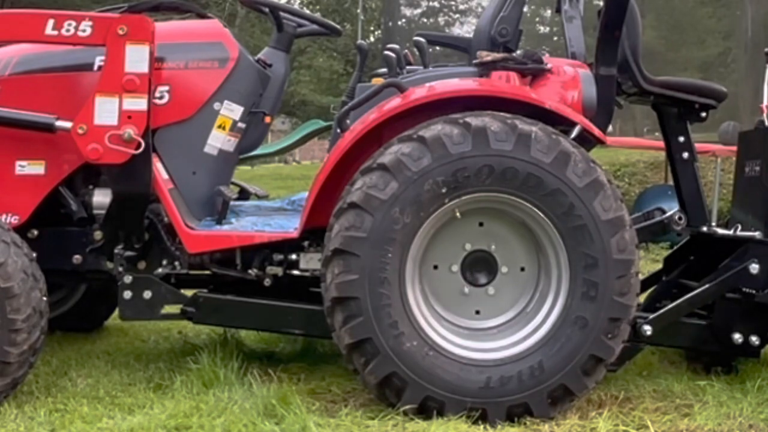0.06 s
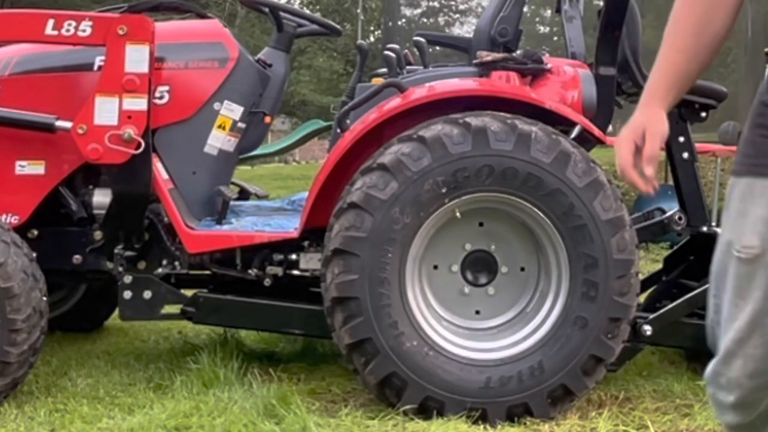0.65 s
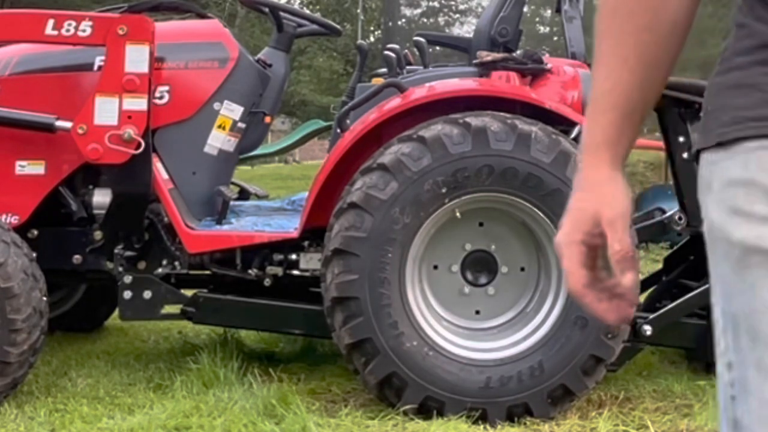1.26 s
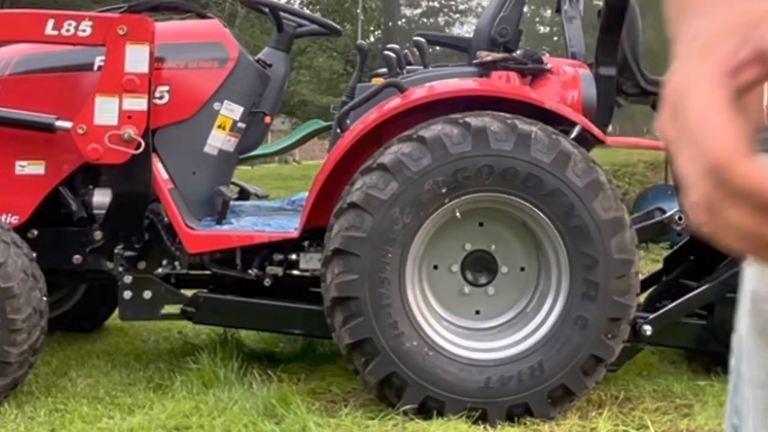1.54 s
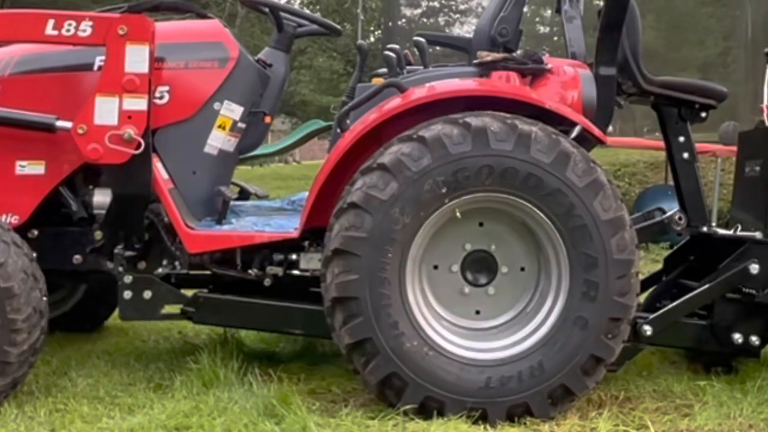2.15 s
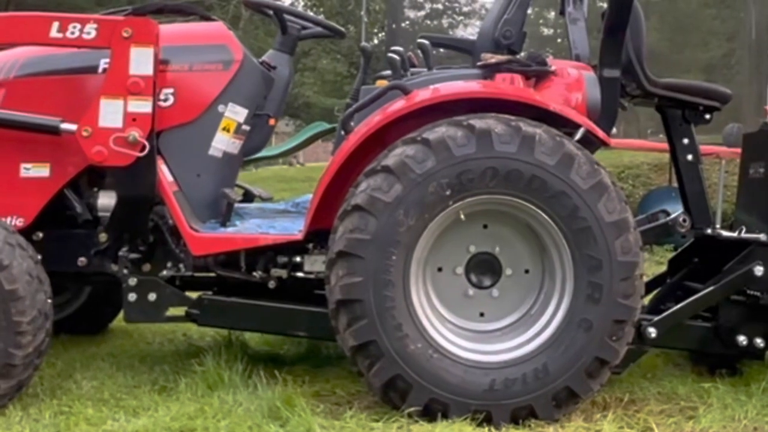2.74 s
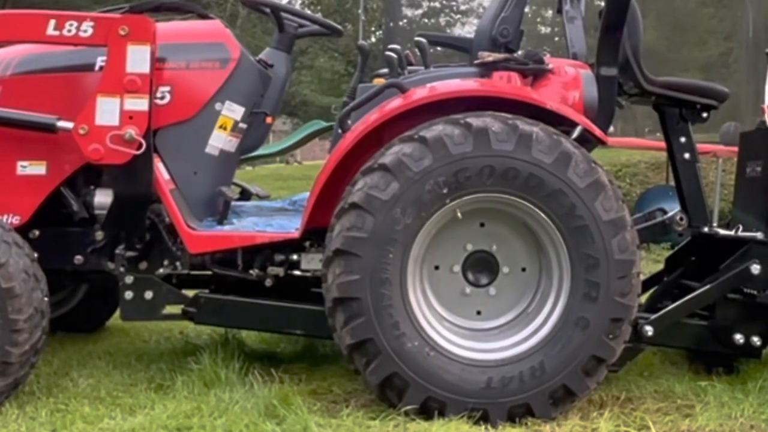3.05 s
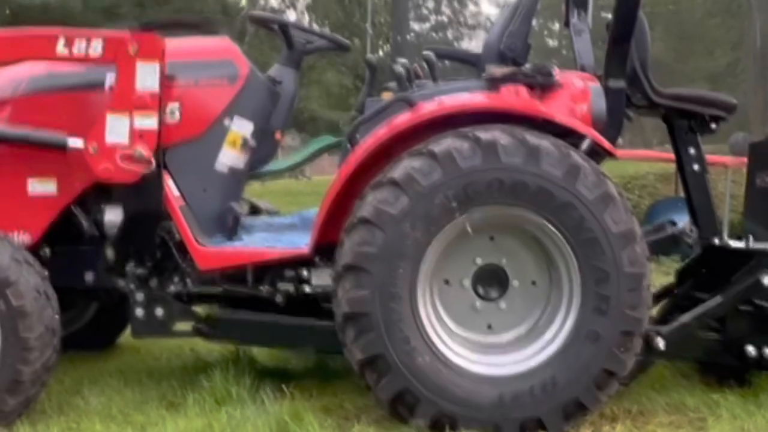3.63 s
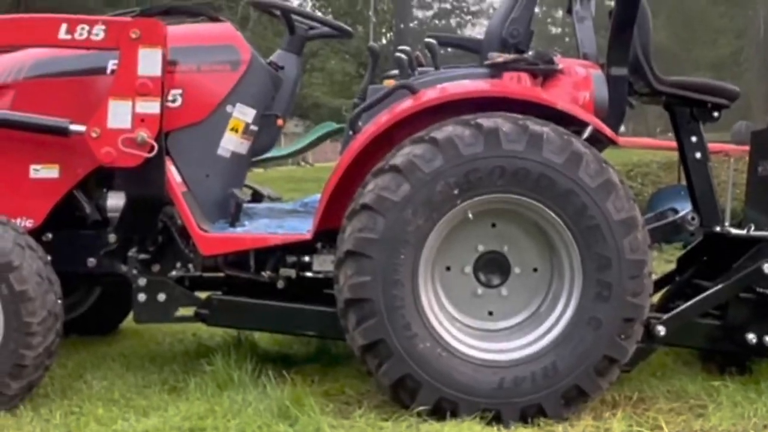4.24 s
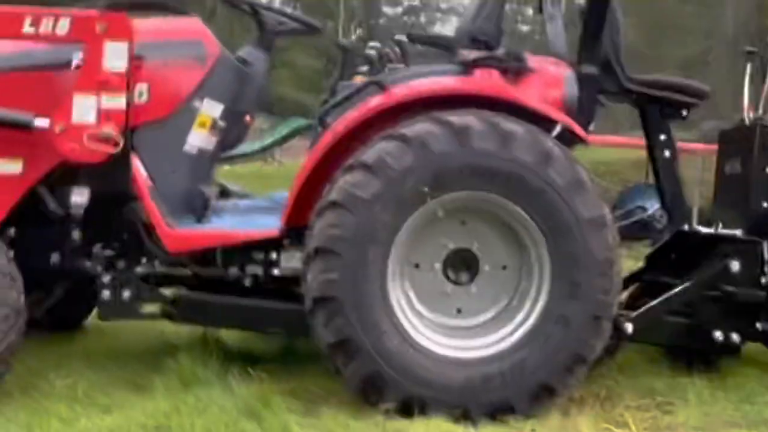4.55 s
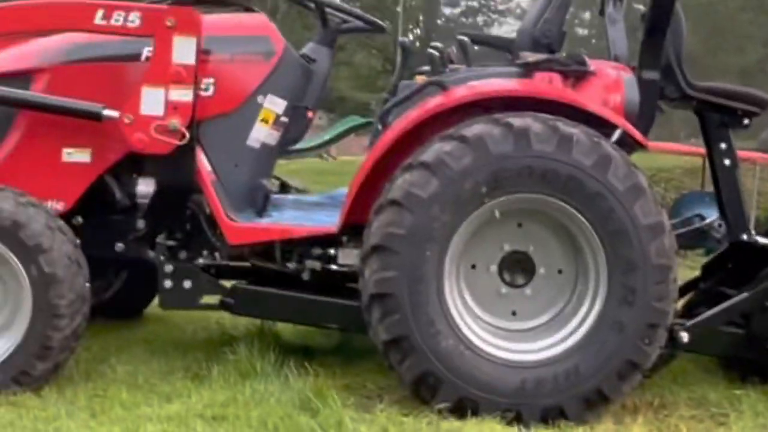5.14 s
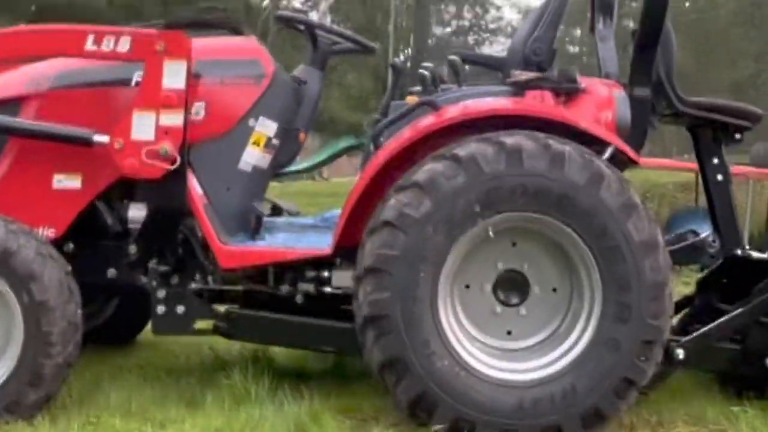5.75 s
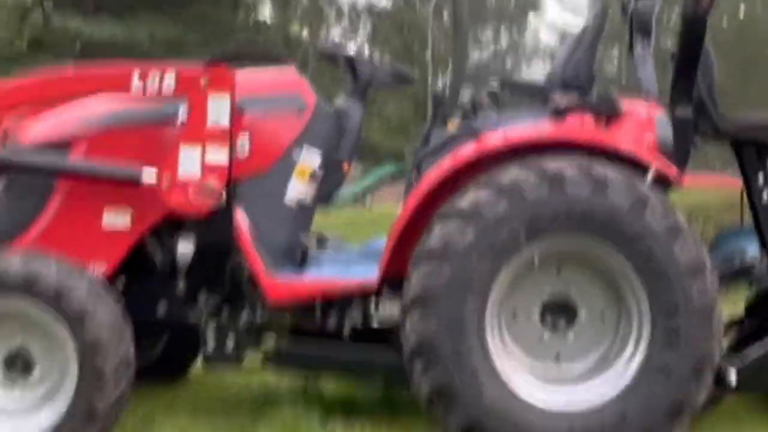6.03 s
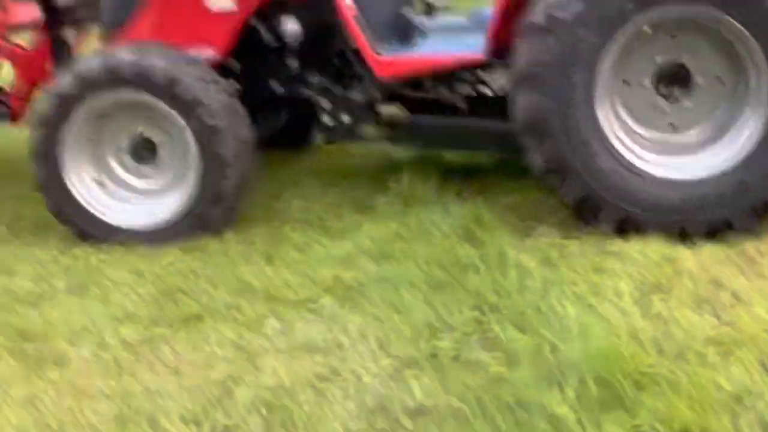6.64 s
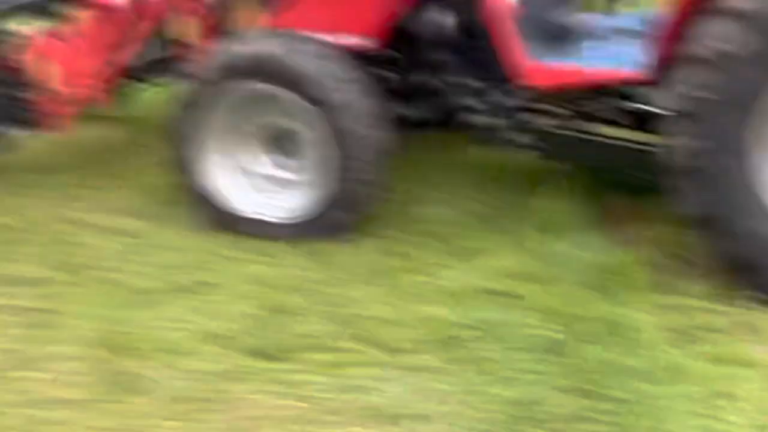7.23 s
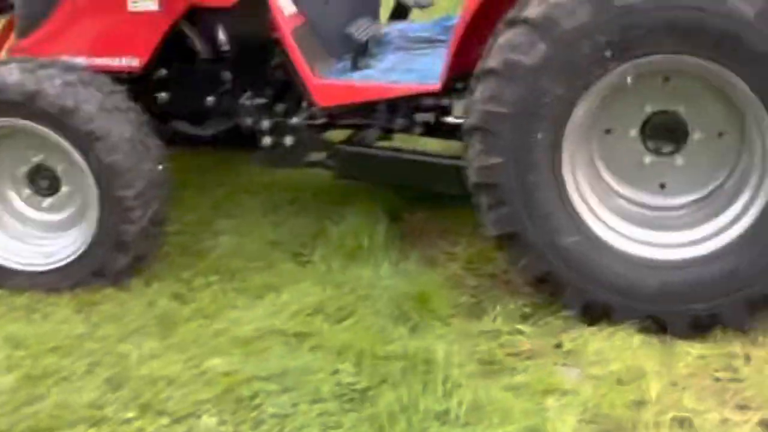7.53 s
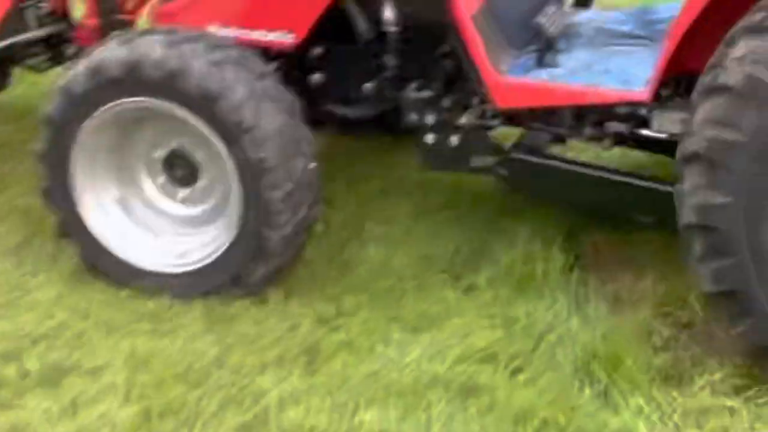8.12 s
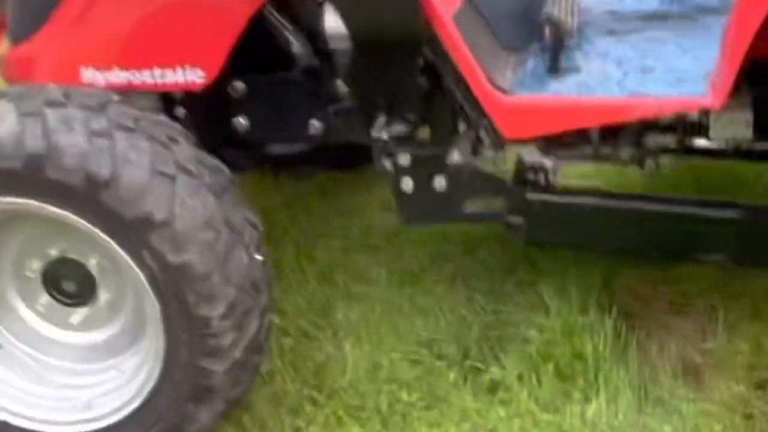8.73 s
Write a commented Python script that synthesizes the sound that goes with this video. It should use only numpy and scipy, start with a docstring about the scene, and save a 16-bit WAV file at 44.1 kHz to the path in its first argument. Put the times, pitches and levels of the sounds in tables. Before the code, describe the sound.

Outdoors, the steady throb and ticking clatter of an idling diesel tractor run throughout. Very close hollow knocks, soft thumps and plastic clicks break in as the camera is worked out of a spring clamp, peaking in one loud, rattling cluster. More light taps and rubs follow. Then the microphone is carried through rustling grass toward the engine, which becomes louder and more clattery.

```python
"""A three-cylinder compact tractor idles on a lawn: exhaust throb, and block clatter at every firing.
Someone takes hold of the camera and works it out of a sprung clamp: fingers knock, the stand thumps,
the jaw clicks and the spring rings, right at the microphones. The hardest hits push a limiter down.
Then they carry it through swishing grass towards the engine, which grows louder."""
import sys
import numpy as np
from scipy import signal
from scipy.fft import rfft, irfft, next_fast_len
from scipy.io import wavfile
from scipy.ndimage import uniform_filter1d, minimum_filter1d

SR = 44100
rng = np.random.default_rng(int(sys.argv[2]) if len(sys.argv) > 2 else 0)


def int16_out(signal):
    """Quantize to a 16-bit WAV file."""
    q = np.round(np.clip(np.atleast_2d(signal).T, -1, 1) * 32767)
    wavfile.write(sys.argv[1], SR, q.astype(np.int16))


N = 396018
TIME = np.arange(N) / SR
CRANK_HZ, CYLINDER_COUNT = 20.8, 3
FIRING_HZ = CRANK_HZ * CYLINDER_COUNT / 2   # one cycle = two crank turns


def from_db(db):
    return 10 ** (np.asarray(db) / 20)


def unit_rms(x):
    return x / np.sqrt(np.mean(x ** 2) + 1e-20)


def unit_hit(sound):
    """Scale a stereo hit to the energy of 20 ms at rms 1."""
    return sound / np.sqrt(np.sum(sound ** 2) / 2 / (SR / 50) + 1e-20)


def at_hz(points, hz):
    """Read a table on a log-frequency axis."""
    point_hz, value = np.transpose(points)
    return np.interp(np.log(hz + 1), np.log(point_hz), value)


def drift(rate_hz):
    """Random wander, rms 1."""
    knots = rng.standard_normal(int(rate_hz * N / SR) + 2)
    return unit_rms(np.interp(TIME * rate_hz, np.arange(len(knots)), knots))


def band(x, low_hz, high_hz):
    return signal.sosfilt(signal.butter(2, [low_hz, high_hz], "band", fs=SR, output="sos"), x)


def pan(left_db):
    """Constant-power stereo gains; left_db is left minus right."""
    return unit_rms(from_db([[left_db / 2], [-left_db / 2]]))


def add(out, start_s, sound):
    at = round(start_s * SR)
    out[:, at:at + sound.shape[1]] += sound[:, :N - at]


def noise(spectrum, resonances=(), white=None):
    """Shaped stereo noise, rms 1; microphone likeness and balance vary with frequency."""
    # Likeness of the two microphones: freq_hz, correlation (clipped below)
    likeness = [(60, 1), (130, 0.3), (270, 1.16), (580, -0.67), (1230, 1), (2620, -0.24), (5570, 0),
                (11800, 0)]
    # Their balance: freq_hz, left_db
    left_bias = [(60, -5), (110, 1.5), (190, 1), (350, 1.5), (630, 6.5), (1130, 8.5), (2030, 1), (3660, 1),
                 (6590, 5.5), (11800, -8.5)]
    size = next_fast_len(N)
    hz = np.arange(size // 2 + 1) * SR / size
    peaks_db = sum(lift / (1 + (2 * (hz - centre) / width) ** 2) for centre, width, lift in resonances)
    alike, sign = np.clip(at_hz(likeness, hz), -.98, .98), np.array([[1], [-1]])
    level_db = at_hz(spectrum, hz) + peaks_db + sign * at_hz(left_bias, hz) / 2
    mid, side = rfft(rng.standard_normal((2, size)) if white is None else white, size)
    pair = np.sqrt(1 + alike) * mid + sign * np.sqrt(1 - alike) * side
    return unit_rms(irfft(pair * from_db(level_db), size)[:, :N])


def ring(age_s, hz, t60_s, rise_s):
    """One struck mode."""
    age_s = np.maximum(age_s, 0)
    return np.sin(2 * np.pi * hz * age_s) * from_db(-60 * age_s / t60_s) * (1 - np.exp(-age_s / rise_s))


def lows_late(sound, delay_cycles=2.2):
    """Delay each frequency by about delay_cycles of its own periods: a hit sweeps quickly down."""
    size = next_fast_len(sound.shape[1])
    hz = np.arange(size // 2 + 1) * SR / size
    phase = 2 * np.pi * delay_cycles * np.log1p(hz / 20)
    return irfft(rfft(sound, size) * np.exp(-1j * phase), size)[:, :sound.shape[1]]


def cyclic_noise(firings, repeat_share):
    """White excitation; a share of its power repeats every engine cycle."""
    size = round(2 * SR / CRANK_HZ)
    one_cycle = unit_rms(irfft(np.exp(2j * np.pi * rng.random((2, size // 2 + 1))), size))
    looped = one_cycle[:, (firings / CYLINDER_COUNT * size).astype(int) % size]
    return np.sqrt(repeat_share) * looped + np.sqrt(1 - repeat_share) * rng.standard_normal((2, N))


def firing_gain(firings, cylinder_db, peak_firings, depth_db, flatten=0.17):
    """One broad-topped swell per firing; each cylinder has its own strength."""
    index = np.floor(firings - peak_firings + .5).astype(int)
    swell = np.cos(2 * np.pi * (firings - peak_firings))
    strength_db = cylinder_db[index % CYLINDER_COUNT] + rng.normal(0, 1.0, index.max() + 2)[index]
    return unit_rms(from_db(depth_db * (swell - flatten * swell ** 2) + strength_db * (1 + swell) / 2))


def throb(firings, pulse_firings=0.469, waver_db=1.5, smear_rad=0.012, right_lag_s=0.00027):
    """Exhaust: crank orders sum to a strong and a weak pressure dip per firing."""
    # Exhaust and vibration lines: crank_multiple, relative_db
    orders = [(1.5, -43), (3, -32), (4.5, -45), (6, -33), (7.5, -37), (9, -36), (10.5, -74), (12, -40.5),
              (13, -78), (13.5, -43), (14, -41.5), (15, -78), (16, -51), (31, -62), (32.5, -56)]
    turns = (firings - pulse_firings) * 2 / CYLINDER_COUNT
    wavers = [drift(6.1) for _ in range(3)]
    left = 0
    for i, (order, db) in enumerate(orders):
        lead_rad = 4.0 * (orders[0][0] / order) ** 5   # microphone low cut advances the deepest order
        phase = 2 * np.pi * order * turns + lead_rad - smear_rad * order
        left = left + from_db(db + waver_db * wavers[i % 3]) * np.cos(phase)
    right = np.interp(TIME - right_lag_s, TIME, left)
    return -unit_rms(np.array([left, right])) * pan(.6)


def rumble(firings):
    """Low engine noise, partly alike in every cycle."""
    # Rumble spectrum: freq_hz, density_db
    spectrum = [(25, -6), (40, 3), (55, 4.5), (85, 3.5), (140, 2), (200, 4), (235, -4.5), (288, 4.5),
                (370, -4), (450, -16.5), (600, -50), (2000, -100)]
    return noise(spectrum, white=cyclic_noise(firings, repeat_share=0.35))


def clatter(firings, shocks, far_db, near_db, split_hz=1000):
    """Firings shake block and panels: deep knock below split_hz, bright clatter above."""
    # Clatter from afar: freq_hz, density_db
    far_spectrum = [(300, 5), (480, -2), (680, 3.5), (830, 4.5), (1200, -8.5), (1500, 1), (1850, -9.5),
                    (2450, -6.5), (3000, -14.5), (4500, -21), (5600, -28.5), (6600, -17.5), (9200, -22.5),
                    (11000, -39), (12500, -59)]
    # Clatter beside the open engine bay: freq_hz, density_db
    near_spectrum = [(220, -49), (390, -34), (455, -6.5), (672, 0), (765, -15), (833, -8.5), (1170, -8.5),
                     (1650, -6), (2390, -17), (2760, -18), (5480, -33.5), (8280, -30), (11500, -60),
                     (15000, -82), (22000, -120)]
    # Block and panel resonances: centre_hz, width_hz, lift_db
    resonances = [(785, 21, 2.5), (830, 30, 6), (1025, 33, 15.5), (1085, 25, 14), (1638, 48, 13),
                  (1982, 89, 14.5), (2324, 65, 12.5), (3290, 29, 13.5), (3700, 180, 7.5), (4920, 560, 7.5)]
    # Cylinder strengths in firing order: bright_db, deep_db
    cylinders = [(2, 6.5), (3, 1.5), (4, 4.5)]
    bright_db, deep_db = np.transpose(cylinders)
    far = noise(far_spectrum, resonances, shocks)
    near = noise(near_spectrum, white=cyclic_noise(firings, repeat_share=0.29))
    metal = from_db(far_db) * far + from_db(near_db) * near
    deep = signal.sosfiltfilt(signal.butter(2, split_hz, fs=SR, output="sos"), metal)
    deep_gain = firing_gain(firings, deep_db, peak_firings=-0.0024, depth_db=-2.0)
    bright_gain = firing_gain(firings, bright_db, peak_firings=0.024, depth_db=1.0)
    return deep * deep_gain + (metal - deep) * bright_gain


def valves(firings, spread_db=0.1, jitter_s=.0004, max_lag_s=0.00017):
    """Each valve or injector strikes once a cycle and rings its own note, never quite alike."""
    # Valve and injector notes: place_firings, pitch_hz, over_clatter_db
    notes = [(0.01, 1693, -17), (0.7, 1617, -26), (0.781, 2380, -23.5), (1.02, 1704, -16.5),
             (0.999, 831, -18.5), (1.677, 1384, -16), (1.761, 803, -14), (1.82, 2306, -19),
             (2.67, 2342, -24.5), (2.903, 2036, -17)]
    out, cycles = np.zeros((2, N)), np.arange(int(firings[-1] / CYLINDER_COUNT) + 1)
    for place, hz, db in notes:
        strike_s = np.interp(cycles * CYLINDER_COUNT + place, firings, TIME)
        strike_s += rng.normal(0, jitter_s, len(cycles))
        strikes, at = np.zeros(N), np.clip((strike_s * SR).astype(int), 0, N - 1)
        strikes[at] = from_db(rng.normal(0, spread_db, len(cycles)))
        note = ring(TIME[:SR // 12] - rng.uniform(0, max_lag_s, (2, 1)), hz, t60_s=0.043, rise_s=0.00044)
        out += from_db(db) * unit_rms(signal.oaconvolve(strikes[None], note, axes=1)[:, :N])
    return out * pan(1.4)


def clacks(firings, shocks, edge_ratio=1.428, rise_s=.0012, t60_s=0.031):
    """Each injector snaps shut and each piston slaps once a cycle: short, broad bursts."""
    # Injectors (high) and pistons (low): place_firings, centre_hz, over_clatter_db
    impacts = [(0.68, 2230, -24.5), (0.72, 900, -20), (0.8, 312, -13), (1.62, 2230, -29), (1.69, 741, -13),
               (2.64, 2230, -25), (2.7, 952, -18.5)]
    out = 0
    for place, hz, db in impacts:
        age_s = (firings - place) % CYLINDER_COUNT / FIRING_HZ
        burst = shocks[0] * (1 - np.exp(-age_s / rise_s)) * from_db(-60 * age_s / t60_s)
        edges_hz = hz / edge_ratio, hz * edge_ratio
        out = out + from_db(db) * unit_rms(band(band(burst, *edges_hz), *edges_hz))
    return lows_late(out[None]) * pan(1.8)


def engine(start_m=3.33, lower_at_s=5.9, lowering_s=0.99):
    """Firings drive all engine layers; the camera is lowered to the open bay, then carried closer."""
    # Microphone path towards the engine: time_s, walked_m
    approach = [(0, 0), (7.3, 0), (8, 1.28), (9, 1.85)]
    walked_m = np.interp(TIME, *np.transpose(approach))
    closer_db = 20 * np.log10(start_m / (start_m - walked_m))
    lowered = np.clip((TIME - lower_at_s) / lowering_s, 0, 1)
    bass_db = -28.5 + 0.59 * closer_db - 0.5 * lowered
    far_db = -36.5 + 0.21 * closer_db - 3 * lowered
    near_db = -46 + 1.4 * closer_db + 8.5 * lowered
    firings = FIRING_HZ * (TIME + walked_m / 343) + 0.0024 * drift(8)   # running count, with Doppler
    shocks = cyclic_noise(firings, repeat_share=.55)
    block = clatter(firings, shocks, far_db, near_db)
    bass = from_db(bass_db) * (throb(firings) + from_db(-5.0) * rumble(firings))
    ticking = np.hypot(from_db(far_db), from_db(near_db - 2)) * valves(firings)
    clacking = np.hypot(from_db(far_db), from_db(near_db)) * clacks(firings, shocks)
    return bass + block + ticking + clacking


def swells(rows):
    """Gain of Gaussian swells from rows of centre_s, half_length_s, level_db."""
    power = np.zeros(N)
    for centre_s, half_s, db in rows:
        near = np.abs(TIME - centre_s) < .25
        power[near] += from_db(2 * db) * np.exp(-((TIME[near] - centre_s) / half_s) ** 2)
    return np.sqrt(power)


def rustles(catches_per_s=2600, wander_db=3.5, grain_db=-0.5):
    """Hands and grass: tiny catches rustle in shifting colour, crushed blades crackle, skin hisses."""
    # Rustle spectrum: freq_hz, density_db
    grass_spectrum = [(300, 9), (700, -2), (1450, 0.5), (2200, 0), (3200, -12), (5500, -21), (8000, -25),
                      (10500, -33), (12500, -55)]
    # Crushed blades: freq_hz, density_db
    blade_spectrum = [(1200, -30), (2200, 2), (3300, 5), (5500, -10), (8000, -14), (10500, -25),
                      (12500, -47)]
    # Hand brushing the casing: centre_s, half_length_s, level_db
    rubs = [(2.68, 0.11, -36.5), (3.676, 0.033, -29.5), (4.747, 0.026, -27), (4.94, 0.054, -31.5),
            (5.045, 0.021, -26), (5.232, 0.018, -26), (5.34, 0.013, -31.5), (5.55, 0.13, -31),
            (5.977, 0.053, -32.5), (6.267, 0.022, -27), (7.295, 0.038, -27)]
    # Legs and feet in grass: centre_s, half_length_s, rustle_db, crackle_db
    swishes = [(2.104, 0.088, -46.5, -60), (7.425, 0.026, -25, -67), (7.642, 0.047, -26, -38.5),
               (7.718, 0.024, -34, -37), (7.807, 0.033, -25.5, -40), (7.912, 0.046, -26, -39.5),
               (8.006, 0.029, -23.5, -42), (8.189, 0.028, -32, -43), (8.332, 0.023, -29.5, -38),
               (8.402, 0.038, -27, -57)]
    # Skin sliding on the casing: centre_s, half_length_s, level_db
    slides = [(2.12, 0.11, -56), (3.68, 0.021, -49), (5.245, 0.014, -48), (5.59, 0.028, -49)]
    catches = rng.standard_normal((2, N)) * (rng.random(N) < catches_per_s / SR)
    rustle, edges_hz = noise(grass_spectrum, white=catches), np.geomspace(350, 11500, 10)
    shifting = sum(band(rustle, low, high) * (-1) ** k * from_db(wander_db * drift(24))
                   for k, (low, high) in enumerate(zip(edges_hz, edges_hz[1:])))
    shifting = unit_rms(shifting * from_db(grain_db * drift(700)))
    blades = noise(blade_spectrum)
    hiss = unit_rms(band(rng.standard_normal((2, N)), 4700, 8400))
    rustle_gain = swells(rubs + [(s, half_s, db) for s, half_s, db, _ in swishes])
    blade_gain = swells([(s, half_s, db) for s, half_s, _, db in swishes])
    return rustle_gain * shifting + blade_gain * blades + swells(slides) * hiss


def contact(age_s, rise_s, t60_s):
    """Stereo noise of one rough contact: fast build-up, then decay."""
    envelope = (1 - np.exp(-(age_s / rise_s) ** 2)) * from_db(-60 * age_s / t60_s)
    return rng.standard_normal((2, len(age_s))) * envelope


def at_mics(age_s, onset_s=0.0003, left_lag_s=0.0006):
    """A ring starts just after the contact and reaches the left microphone later."""
    return age_s - onset_s - np.array([[left_lag_s], [0]])


def casing(age_s):
    """Low, damped ring and thud of the whole casing."""
    burst = contact(age_s, rise_s=0.0008, t60_s=0.035)
    thud = unit_hit(band(band(burst, 170, 490), 156, 560))
    body = unit_hit(ring(at_mics(age_s), hz=320, t60_s=0.011, rise_s=0.00024))
    return unit_hit(body + 0.76 * thud)


def hollow(hz):
    """Hollow note of a struck shell."""
    return unit_hit(ring(at_mics(TIME[:SR // 8]), hz, t60_s=0.029, rise_s=0.00024))


def shell_hit(hz, t60_s, ring_share, body_db, tick_db, tick_top_hz):
    """A gritty tick, a two-mode clack of the shell and the lower ring of the casing."""
    age_s = TIME[:SR // 8]
    grit = contact(age_s, rise_s=0.001, t60_s=0.022)
    tick = unit_hit(band(band(grit, 2160, tick_top_hz), 1500, 7400))
    burst = contact(age_s, rise_s=0.0007, t60_s=0.028)
    crunch = unit_hit(band(band(burst, hz * 0.45, 2550), 200, 2520))
    fundamental = ring(at_mics(age_s), hz, t60_s, rise_s=0.0011)
    overtone = ring(at_mics(age_s), 1.925 * hz, t60_s=0.012, rise_s=0.00044)
    shell = unit_hit(fundamental + from_db(-21) * overtone)
    clack = unit_hit(ring_share * shell + (1 - ring_share) * crunch)
    return clack + from_db(body_db) * casing(age_s) + from_db(tick_db) * tick


def spring(max_lag_s=0.000388):
    """A short scrape sets the clamp's steel spring ringing."""
    # Spring snaps: start_s, level_db
    snaps = [(3.714, -31), (4.336, -18), (6.498, -20)]
    # Spring modes: pitch_hz, relative_db, t60_s
    modes = [(3270, -9, 0.037), (3940, -5, 0.02), (5020, -2, 0.024), (6130, 2.5, 0.032), (6930, 1, 0.039),
             (8050, 4, 0.043), (8500, 6, 0.027), (9710, -19, 0.016)]
    out, age_s = np.zeros((2, N)), TIME[:SR // 8]
    for start_s, db in snaps:
        scrape = band(band(contact(age_s, rise_s=0.0043, t60_s=0.017), 3500, 10500), 3500, 10500)
        ringing = 0
        for hz, mode_db, t60_s in modes:
            lag_s = rng.uniform(0, max_lag_s, (2, 1))
            ringing = ringing + from_db(mode_db) * ring(age_s - lag_s, hz, t60_s, rise_s=0.0056)
        add(out, start_s, from_db(db) * (unit_hit(ringing) + 0.63 * unit_hit(scrape)) * pan(2.9))
    return out


def jaw(lead_s=0.0012):
    """The clamp's plastic jaw clicks as it slips, over its own hollow note."""
    # Jaw slips: time_s, click_db, click_hz, tick_over_click_db
    slips = [(3.7161, -19.5, 1550, -7.5), (3.812, -37, 1550, -14), (4.2, -31, 1555, -13),
             (4.28, -26, 1530, -12), (4.547, -34.5, 1500, -31), (4.631, -33, 1560, -16),
             (4.8594, -20.5, 2030, 0.5), (4.864, -22.5, 1800, -7)]
    out = np.zeros((2, N))
    for time_s, db, hz, tick_db in slips:
        click = shell_hit(hz, t60_s=0.027, ring_share=0.52, body_db=-3.5,
                          tick_db=tick_db, tick_top_hz=9500)
        click += from_db(-5.5) * hollow(hz=1465)
        add(out, time_s - lead_s, from_db(db) * lows_late(click) * pan(4))
    return out


def thumps(right_db=-13, right_lag_s=0.00023):
    """Bumps sway the stand and ring the casing; the left microphone is nearest the hand."""
    # Soft bumps on the camera: start_s, strength_db, sway_hz
    bumps = [(1.917, -12, 75.4), (2.448, -7, 122), (2.828, -14.5, 121.5), (3.328, -12.5, 123.6),
             (3.675, -21.5, 182), (4.288, -18, 101), (4.475, -10, 117), (4.78, -12.5, 122),
             (5.255, -15.5, 122), (5.918, -12.5, 116.5), (6.008, -10.5, 68.4), (6.068, -17, 114),
             (7.264, -11, 75)]
    out, age_s = np.zeros((2, N)), TIME[:SR // 4]
    for start_s, db, hz in bumps:
        sway = ring(age_s - np.array([[0], [right_lag_s]]), hz, t60_s=0.13, rise_s=0.0036)
        sway = from_db(db - 0.5) * unit_hit(sway * from_db([[0], [right_db]]))
        body = from_db(-22.5 + 0.87 * db) * casing(age_s) * pan(8)
        add(out, start_s, sway + body)
    return out


def knocks(lead_s=0.001003):
    """Fingers strike the casing: a clack and a hollow note, both set by grip and striking point."""
    # Finger knocks: time_s, clack_db, clack_hz, hollow_db, hollow_hz, body_db, tick_db, left_db
    # (hollow, body and tick relative to the clack)
    hits = [(1.8954, -15.5, 2255, 0.5, 856, 6.5, -20, -1), (1.9096, -19, 1270, 3, 820, 5, -25, 4),
            (2.4453, -29.5, 1520, -12, 560, 17.5, -22, 5.5), (3.7706, -12.5, 2018, 0.5, 660, -1, -14, 3),
            (4.076, -31.5, 1250, 11, 776, 10.5, -36, 6), (4.338, -21, 1520, 11, 855, 12, -25, -4),
            (4.3441, -13.5, 1450, 10.5, 415, -7, -13.5, 15), (4.351, -8, 1140, 6, 587, 0, -6.5, 1),
            (4.361, -8.5, 1400, 5.5, 726, -1, -17, 17), (4.373, -15, 1300, 12.5, 726, -8, -22, 6),
            (4.472, -29.5, 1180, -10, 910, 11.5, -17, 7), (4.486, -28, 1360, -12, 507, 7, -9.5, 12),
            (4.779, -33, 1090, -4, 620, 9, -20, 1), (5.042, -33, 1900, -5, 1150, -1, -16, 3),
            (5.754, -22, 1570, -4, 840, 4, -20.5, 9), (5.774, -26.5, 1210, 2, 560, 3, -30, 4),
            (5.81, -26, 1410, 5.5, 1010, 3.5, -16.5, 3), (5.888, -29, 1440, -1, 667, 4, -5.5, 7),
            (5.923, -18.5, 1230, -1.5, 454, -6, -16.5, 4.5), (5.958, -32, 1450, 6, 500, 7.5, -32, 7),
            (5.989, -19, 1470, -4, 690, -3, -9.5, 4.5), (6.011, -33.5, 1310, 9, 890, 6, -32, 7),
            (6.061, -30.5, 1890, 13, 786, 4, -31, 8), (6.069, -29.5, 1180, 9, 737, -5, -17, 12),
            (6.1646, -21.5, 1360, 6, 713, -3, -15, 8.5), (6.2545, -23, 1290, -4, 760, -6, -23, 3),
            (6.2872, -28, 1380, -14, 810, -3, -23, 7), (7.2542, -19.5, 1820, -5, 422, -1, -10.5, 9),
            (7.26, -21.5, 1350, -3, 710, 4, -33, 7)]
    out = np.zeros((2, N))
    for time_s, db, hz, hollow_db, hollow_hz, body_db, tick_db, left_db in hits:
        knock = shell_hit(hz, t60_s=0.025, ring_share=0.45, body_db=body_db,
                          tick_db=tick_db, tick_top_hz=7650)
        knock += from_db(hollow_db) * hollow(hollow_hz)
        add(out, time_s - lead_s, from_db(db) * lows_late(knock) * pan(left_db))
    return out


def scene():
    """The idling engine, with handling and footsteps at the microphones."""
    return engine() + knocks() + jaw() + thumps() + spring() + rustles()


def record(dry, ceiling=0.98, hold_s=0.093, release_db_per_s=62.0, cutoff_hz=12300):
    """A limiter ducks just ahead of the hardest hits, holds and recovers; a steep low-pass follows."""
    over_db = np.maximum(20 * np.log10(np.abs(dry).max(axis=0) / ceiling + 1e-9), 0)
    half_hold, ahead = int(hold_s * SR / 2), SR // 1000
    held_db = -minimum_filter1d(-over_db, 2 * half_hold + 1, origin=half_hold - ahead)
    duck_db = np.maximum.accumulate(held_db + release_db_per_s * TIME) - release_db_per_s * TIME
    limited = dry * from_db(-uniform_filter1d(duck_db, size=2 * ahead))
    return signal.sosfilt(signal.ellip(10, .1, 70, cutoff_hz, fs=SR, output="sos"), limited)


dry = scene()
out = record(dry)
int16_out(out)
```